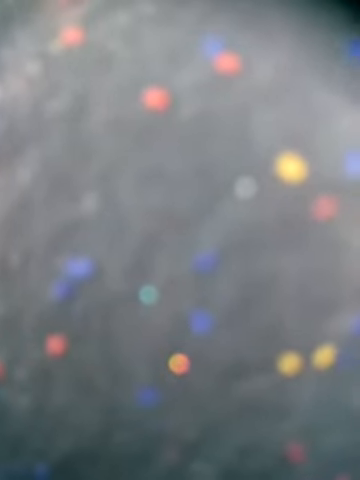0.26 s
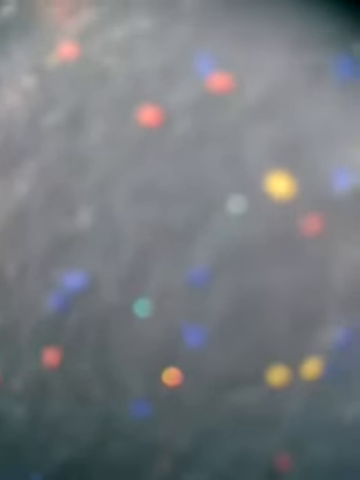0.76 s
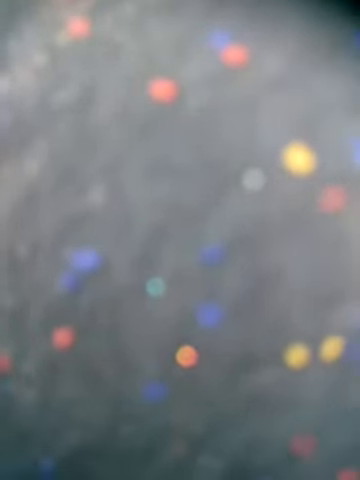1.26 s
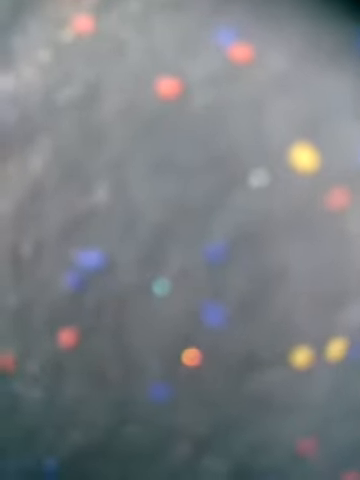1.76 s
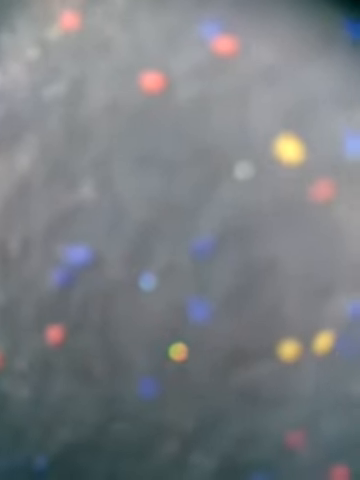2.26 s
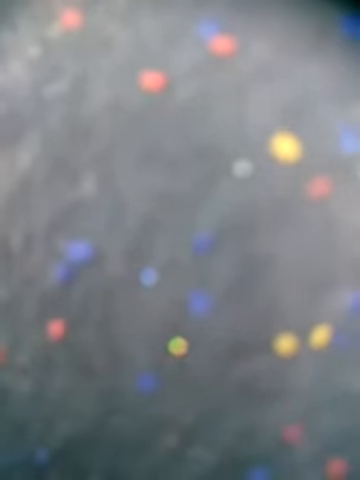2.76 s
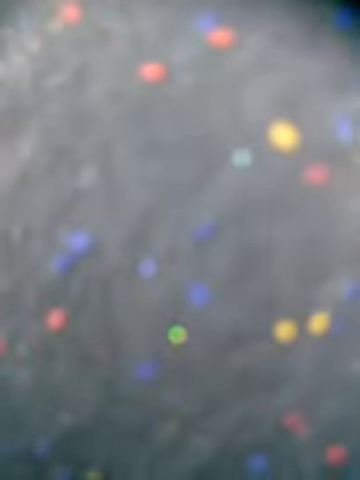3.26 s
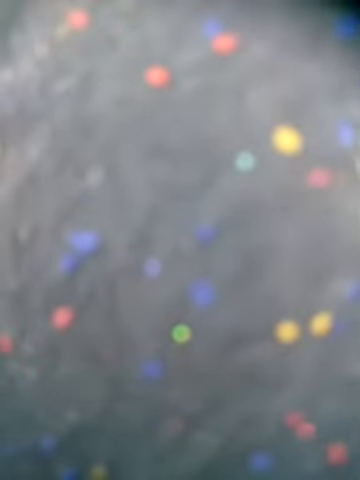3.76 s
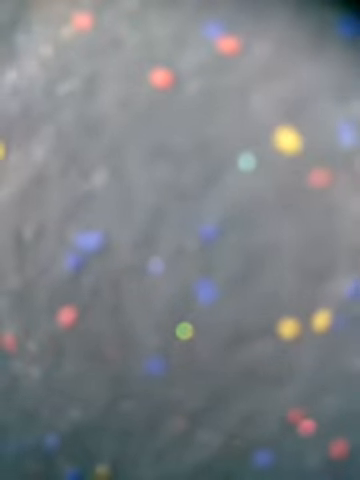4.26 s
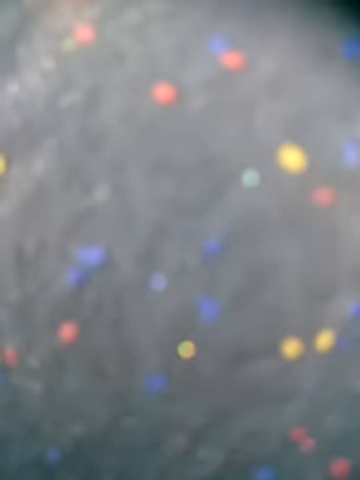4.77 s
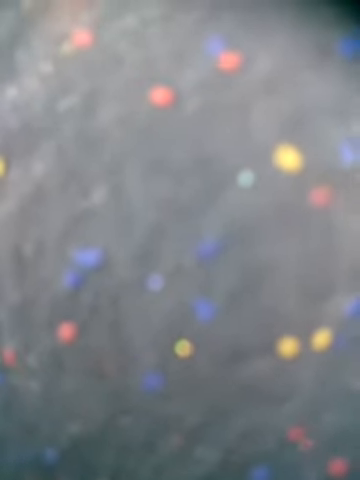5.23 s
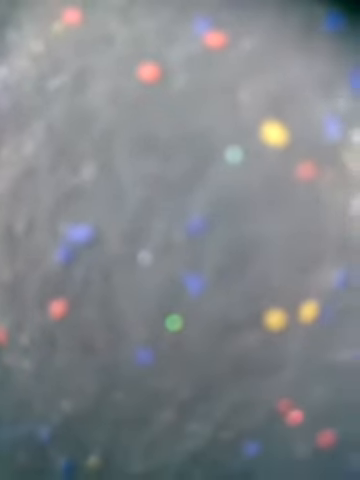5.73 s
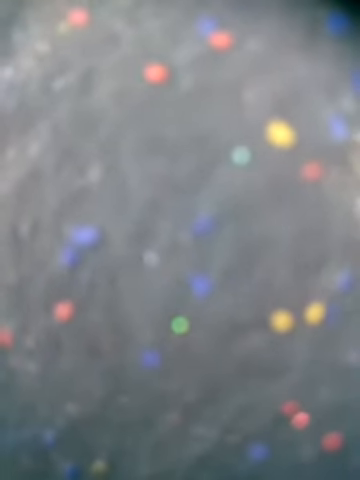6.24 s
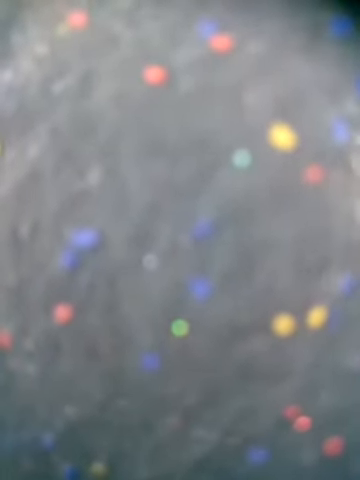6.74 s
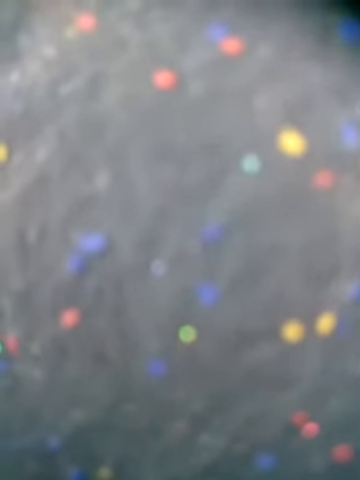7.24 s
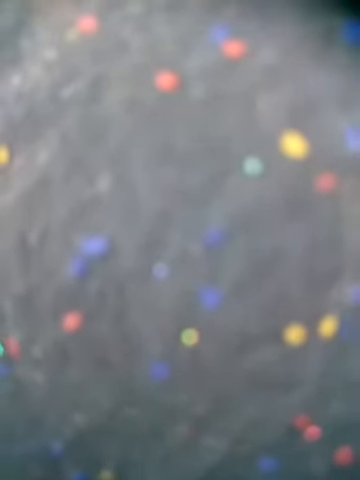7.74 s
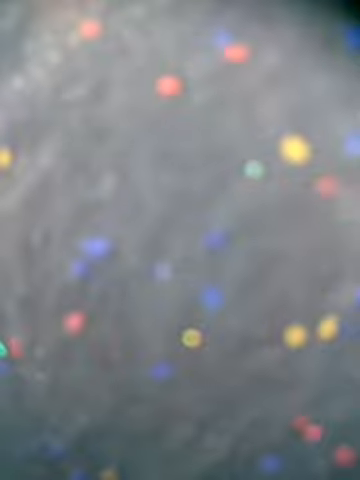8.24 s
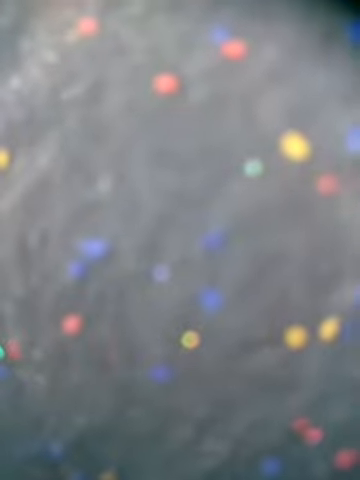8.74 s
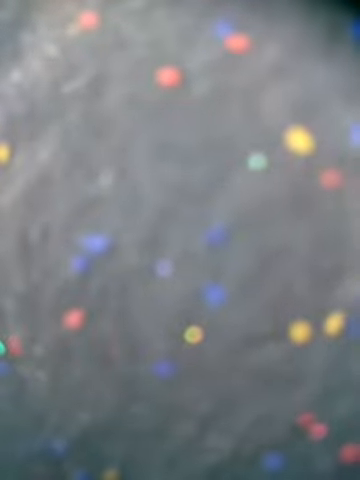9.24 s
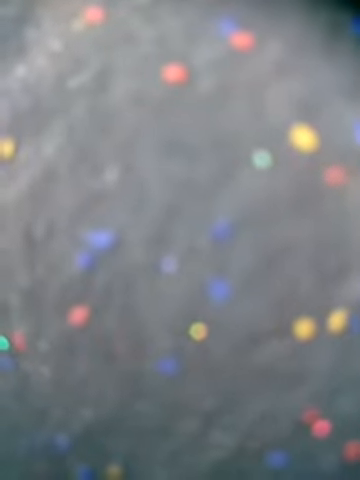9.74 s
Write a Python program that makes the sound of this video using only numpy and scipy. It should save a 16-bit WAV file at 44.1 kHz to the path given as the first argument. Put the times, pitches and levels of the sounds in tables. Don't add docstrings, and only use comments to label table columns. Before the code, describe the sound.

Inside a bus, a six-cylinder diesel drones from below, muffled and bass-heavy, over road rumble. At first it runs fairly lightly, its note sagging slightly; a trim tick sounds at 0.4 seconds and a soft brake squeal runs from about 0.6 to 1.6. Around 1.4 the fuel comes on, clatter and throb return, and a faint gear whine appears. The engine strengthens until about 3.1, when the gearbox shifts up: the pitch drops abruptly, with a puff of air, little rattles and cabin booms. It labours and wavers at this lower note, then climbs from 4.7. At about 5.05 it kicks down, the pitch jumps, and a much louder, deep full-load drone takes over. From there to 10 seconds it holds, creeping upward, with brighter intake hiss and a thin turbo whistle that rises until about 7.5. Close stereo microphones, the right nearer the floor.

```python
import sys
import numpy as np
from scipy import signal
from scipy.fft import rfft, irfft
from scipy.io import wavfile
from scipy.ndimage import uniform_filter1d

SR = 44100
rng = np.random.default_rng(int(sys.argv[2]) if len(sys.argv) > 2 else 0)


def magnitude_from_level(level_db):
    exponent = np.asarray(level_db, float) / 20
    return 10 ** exponent


def dump(signal):
    limited = np.clip(np.atleast_2d(signal).T, -1, 1)
    pcm = np.round(limited * 32767).astype(np.int16)
    wavfile.write(sys.argv[1], SR, pcm)


N = 441000
COARSE = 10

# pitch in Hz, likeness of the two sides from 0 to 1.
LIKENESS = [(60, .97), (200, .8), (250, 0.4), (330, 0.35), (470, .45), (700, .3), (1300, 0.55),
            (2400, 0.38), (5000, .55), (9000, .3), (12000, .15)]
# pitch in Hz, left minus right in dB.
SIDE_DB = [(60, -5), (92, -7.5), (140, -5), (210, -11), (330, -9), (500, -2), (770, -1), (1170, -5.5),
           (1790, -2), (2740, -2), (4190, -1), (6410, -5), (9810, 12), (15000, -5)]
# pitch in Hz, how far the left side leads in radians.
LEFT_LEAD = [(40, .5), (140, 0.4), (280, 0.046), (450, 1.18), (700, 0.79), (1100, 3.86), (1500, 2.3),
             (2000, 7.25), (3300, 8.37), (4000, 12.3), (5000, 14.14), (6000, 17.76), (8000, 16)]
MIC_HISS_DB = -98.5

FUEL_ON_S, FUEL_RISE_S = 1.416, 0.1
UPSHIFT_S, KICKDOWN_S, SHIFT_S = 3.05, 5.05, 0.19
# time in seconds, firings per second in Hz.
SPEED = [(0, 68.6), (.5, 64.4), (1.2, 62.5), (2.1, 63.1), (3.08, 65.8), (3.23, 50.6), (3.42, 50.9),
         (3.53, 53.4), (3.89, 53.9), (4.07, 49.0), (4.35, 50.4), (4.7, 52.4), (4.92, 56.3), (5.05, 60.5),
         (5.17, 68.6), (5.4, 68.2), (6.2, 68.9), (10, 70.55)]
# time in seconds, force of each firing in dB.
EFFORT = [(0, -6), (.5, -1.5), (.8, 2.5), (1.35, -2.5), (1.7, -4.5), (2.1, -3), (2.75, 3), (3.1, 3.5),
          (3.35, -5.5), (3.65, 4.5), (4.1, -0.5), (4.6, -1.5), (4.85, -1.5), (5.3, -4), (6, -0.5), (7.5, 0),
          (10, 0)]
# time in seconds, length in seconds, change in dB.
SLIPS = [
    (3.14, .07, -9),
    (5.05, .08, -9),
]

# pitch in Hz, level in dB per Hz.
FLOOR_PAN = [(24, -37), (33, -19), (48, -13.5), (60, -14), (78, 1.5), (100, -5), (120, -18.5), (170, -13),
             (255, -24.5), (300, -17), (400, -22), (510, -27), (640, -31), (1500, -99.5)]
# pitch in Hz, width in Hz, lift in dB.
CABIN = [(161.8, 11, 6.5), (195.7, 14, 4.5), (284.7, 12, 3.5), (328.2, 16, 7), (348, 12, 2.5), (430, 20, 4),
         (467.8, 24.5, 8), (599, 29, 4.5), (657, 18, 1.5), (757, 49, 8.5), (863.6, 31, 12)]
RUMBLE_DB = [-38.5, -36, -36.5]
COAST_RUMBLE_DB = -1.5

# pitch in Hz, level in dB per Hz.
CLATTER = [(350, -34), (560, -1), (800, -4.5), (1020, -7.5), (1300, -10.5), (1600, -12), (2000, -17),
           (2500, -12.5), (3200, -20), (3800, -27.5), (7000, -74)]
# pitch in Hz, width in Hz, lift in dB.
COVERS = [(536, 30, 5.5), (555, 28, 6.5), (953, 87, 5.5), (1115, 85, 3), (1233, 27, 5.5), (1407, 44, 4),
          (1634, 36, 6), (2010, 170, 8), (2150, 15, 5.5), (2210, 28, 4.5), (2490, 67, 4), (2680, 26, -1.5),
          (2760, 54, 5), (2990, 70, 8), (3130, 52, 4.5), (3480, 56, 5), (3930, 30, 5.5), (4360, 44, 5),
          (5240, 54, 7), (5610, 110, 5), (6160, 37, 4), (6620, 73, 4), (7580, 53, 5), (8960, 60, 7.5)]
CLATTER_DB, COAST_CLATTER_DB = -55.5, -3.5

# pitch in Hz, level in dB per Hz.
HISS_SLOW = [(1500, -57.5), (3400, -0.5), (4100, -5.5), (5200, 0), (6300, -7), (7400, -15.5), (8500, -24.5),
             (10000, -34), (11500, -21), (12600, -27.5), (14500, -28.5), (15700, -27)]
# pitch in Hz, level in dB per Hz.
HISS_FAST = [(1500, -56.5), (3400, -7.5), (4300, -8), (5800, -1), (6900, -6), (7800, -9.5), (8800, -17.5),
             (9900, -25), (11300, -18), (12400, -25), (13100, -25.5), (15700, -26.5)]
HISS_DB, HISS_DB_PER_OCTAVE, COAST_HISS_DB = -66.5, 11.5, -1.5
# time in seconds, length in seconds, level over the hiss in dB.
PUFFS = [
    (0.38, 0.016, 3.5),
    (3.167, 0.047, -0.5),
    (3.334, 0.015, 2),
    (4.819, .04, 1.5),
]

# time in seconds, peak level in dB.
TICKS = [(0.3726, -49), (1.1488, -61), (1.9405, -61), (2.9836, -52), (3.0495, -51), (3.0894, -51),
         (3.3323, -47), (3.413, -46), (3.7494, -53), (4.8698, -55.5)]
# time in seconds, pitch in Hz, level in dB.
TURBO = [(0, 4026, -91), (2.2, 4490, -79.5), (2.65, 4900, -69), (2.85, 5330, -68.5), (3.05, 5700, -63),
         (3.4, 5710, -69.5), (3.8, 5716, -63), (4.3, 5760, -68.5), (4.75, 5790, -63), (5.1, 6050, -59.5),
         (5.5, 6510, -61), (6, 6930, -65), (6.5, 7150, -66), (7, 7220, -68), (7.5, 7560, -71),
         (8.5, 7610, -71), (10, 7540, -67)]
# time in seconds, pitch in Hz, level in dB.
WHINES = [
    [(1.3, 1180, -77.5), (1.6, 1141, -64.5), (3.1, 1211, -66), (3.4, 1209, -70), (4.6, 1205, -92),
     (5, 1192, -65), (10, 1184, -69)],
    [(2.9, 2700, -81), (3.2, 2680, -65.5), (4, 2680, -66.5), (4.8, 2753, -67.5), (5.2, 2780, -75)],
    [(3.1, 3930, -91), (3.6, 3900, -74), (4.6, 3940, -74), (5.1, 3970, -88)],
]
# time in seconds, pitch in Hz, level in dB.
SQUEAL = [(.55, 1265, -73), (.64, 1245, -64.5), (.8, 1197, -63), (.92, 1165, -64.5), (1.3, 1187, -66.5),
          (1.45, 1190, -66), (1.7, 1170, -80)]
# start in seconds, length in
# seconds, pitch in Hz, glide in Hz per second, level in dB.
BOOMS = [(0, .5, 320, -10, -53), (.65, .33, 312, 30, -51), (0, .35, 163, -20, -50),
         (.27, .22, 204, -30, -45), (.6, .35, 148, 10, -46), (.58, .45, 191, -5, -47), (0, 1, 92, -10, -46),
         (.8, .8, 88, 5, -42.5), (1.45, .3, 125, 5, -44), (1.85, .35, 322, 5, -53),
         (1.9, .3, 195, -20, -49), (2.3, .8, 368, 3, -53), (2.97, .33, 200, 5, -40),
         (2.97, .3, 165, 5, -42), (2.95, .17, 362, -10, -48), (3.05, .25, 281, 5, -47),
         (3.2, .25, 153, -5, -39), (3.5, .35, 324, -5, -51), (3.33, .25, 76, 5, -35.5),
         (3.85, .25, 209, -45, -39), (3.98, .24, 290, 30, -49), (4.05, .17, 342, 20, -49),
         (4.76, .22, 278, 60, -43.5), (4.76, .22, 328, -5, -46), (4.86, .16, 207, -5, -42),
         (4.92, .27, 88, 30, -33), (4.93, .25, 155, 5, -41), (4.98, .16, 290, -5, -46),
         (5.08, .25, 335, 30, -48), (3, 1.4, 468, 0, -56), (5.22, .17, 76, -5, -30)]
BOOM_EDGE, BOOM_EDGE_DB = 0.22, -16

# multiple of the firing rate, then dB at light load, after the upshift, at full load.
FIRING = [(1, -53, -54, -39.5), (2, -52, -49.5, -30.5), (3, -54.5, -44.5, -49.5), (4, -55.5, -53, -45),
          (5, -56.5, -53, -48), (6, -54.5, -56.5, -56.5)]
COAST_FIRING_DB = [-4.5, 3, 0.5, -6.5, -1.5, -3]
SLIP_SHARE = [.12, .6, .9, 1.1, 1.1, 1.1]
# seconds early, swell in seconds.
ANSWER = [(0.36, 0.67), (0.026, 0.13), (-.03, 0.17), (-0.011, 0.23), (-.05, .2), (-.05, .2)]
PULSE_SHAPE = [0, .65, 1.9, 1.25, .6, 0]
FLUTTER_DB = [2, .9, .7]
# pitch in Hz, width in Hz, lift in dB.
SHELL = [(65.08, 14.1, 18), (101.2, 9.1, 15), (164.1, 10.7, 16), (204.4, 13.3, 11)]
COAST_SHELL = 0.54
LAG_HZ, LAG_PER_HZ = 69, 0.36

# multiple of the
# camshaft rate, then dB at light load, after the upshift, at full load.
UNEVEN = [(5, -63, -63, -49.5), (7, -41, -51.5, -38), (8, -49, -53.5, -51), (9, -41, -56, -54),
          (10, -50.5, -52.5, -63), (11, -56.5, -55.5, -50.5), (13, -61.5, -57.5, -67),
          (14, -60, -60, -39.5), (15, -45.5, -51, -61), (16, -63.5, -55, -56), (17, -59.5, -51, -61),
          (19, -61, -60.5, -63.5), (20, -59, -60.5, -53), (21, -69, -62, -58.5), (22, -60.5, -67, -66),
          (23, -60.5, -54, -71), (25, -59, -62, -54), (26, -57.5, -60.5, -56), (27, -47.5, -55, -54),
          (28, -50, -62, -46), (29, -65.5, -63.5, -60.5), (31, -52, -57, -49.5), (32, -70.5, -58, -66.5),
          (33, -69.5, -59.5, -60.5), (34, -54.5, -54.5, -62.5), (35, -62, -61, -64),
          (37, -67, -66.5, -57.5), (38, -64, -56, -67.5), (39, -71, -57, -71), (40, -68.5, -63, -54.5),
          (41, -71.5, -65, -60.5), (42, -62, -63, -67), (43, -70, -60, -81),
                (44, -63.5, -68.5, -79.5), (45, -61.5, -70, -83), (47, -81, -71.5, -68),
                (48, -75.5, -77, -72), (49, -78, -61.5, -78.5), (50, -71, -72, -69.5),
                (51, -69.5, -66, -62), (52, -76, -55.5, -56), (53, -71, -61.5, -81),
                (54, -66.5, -69.5, -79.5), (55, -72, -63, -79), (56, -76.5, -66.5, -80.5),
                (57, -73, -76, -65.5), (60, -81, -76, -81.5), (62, -88, -80.5, -71.5),
                (64, -78.5, -77.5, -73.5), (68, -78.5, -75, -82), (70, -78, -83, -89.5),
                (75, -83.5, -77, -76), (82, -80.5, -76, -85)]
MULTIPLES = [5, 7, 8, 9, 10, 11, 13, 14, 15, 16, 17, 19, 20, 21, 22, 23, 25, 26, 27, 28, 29, 31, 32, 33, 34,
             35, 37, 38, 39, 40]
MULTIPLES_UPPER = [41, 42, 43, 44, 45, 47, 48, 49, 50, 51, 52, 53, 54, 55, 56, 57, 60, 62, 64, 68, 70, 75,
                   82]
USUAL_HZ = [63.5, 51.5, 69.5]
BITE_DB, BITE_S = -3, 3.4
COAST_SHAKE_DB, SHAKE_RISE_S = -12.5, 0.18


def curve(rows, t):
    s, *columns = np.transpose(rows)
    return [np.interp(t, s, column) for column in columns]


def read(points, hz):
    f, value = np.transpose(points)
    return np.interp(np.log(hz + 1), np.log(f + 1), value)


def bumps(modes, hz):
    return sum(db / (1 + (2 * (hz - f) / width) ** 2) for f, width, db in modes)


def evened(x):
    return x / np.sqrt(np.mean(x ** 2) + 1e-20)


def wander(top_hz, count, size):
    steps = rng.standard_normal((count, 400))
    smooth = uniform_filter1d(steps, max(1, round(20 / top_hz)), axis=1)
    at = np.linspace(0, size, 400)
    return [np.interp(np.arange(size), at, evened(row)) for row in smooth]


def ramp(t, start_s, length_s):
    return np.clip((t - start_s) / length_s, 0, 1)


def gear_state(t, early_s=0, swell_s=SHIFT_S):
    return ramp(t, UPSHIFT_S, SHIFT_S) + ramp(t + early_s, KICKDOWN_S, swell_s)


def by_gear(gear, values):
    return np.interp(gear, np.arange(3), values)


def coasting(t):
    return 1 - ramp(t, FUEL_ON_S, FUEL_RISE_S)


def puffs_db(t, rows):
    return sum(db * np.exp(-((t - s) / length) ** 2) for s, length, db in rows)


def pair(x):
    pad = 1000
    padded = len(x) + 2 * pad
    x = np.pad(x, pad, "reflect") * signal.windows.tukey(padded, 2 * pad / padded)
    size = padded * COARSE
    spectrum = rfft(x)
    hz = np.arange(len(spectrum)) * SR / size
    half = magnitude_from_level(read(SIDE_DB, hz) / 2)
    both = np.array([half * np.exp(1j * read(LEFT_LEAD, hz)), 1 / half])
    both = both * 2 / (half + 1 / half)
    out = COARSE * irfft(spectrum * both, size)
    return out[:, pad * COARSE:][:, :N]


def noise(field_db, patchy_db, ripple_db, size):
    hop = size // 4
    hz = np.fft.rfftfreq(size, 1 / SR)
    t = np.arange(N // hop + 5) * hop / SR
    a, b, c, d, patches = rng.standard_normal((len(t), len(hz), 5)).T
    patches = evened(uniform_filter1d(uniform_filter1d(patches, 8, 0), 10, 1))
    ripple = rng.standard_normal((2, len(hz), 1))
    ripple = evened(uniform_filter1d(ripple, size=3, axis=1))
    same = np.clip(read(LIKENESS, hz), 0, 1)[:, None]
    half = magnitude_from_level(read(SIDE_DB, hz) / 2)[:, None]
    right = a + 1j * b
    left = same * right * np.exp(1j * read(LEFT_LEAD, hz))[:, None]
    left = left + np.sqrt(1 - same ** 2) * (c + 1j * d)
    level_db = field_db(hz[:, None], t) + patchy_db * patches + ripple_db * ripple
    spectra = np.array([left * half, right / half]) * magnitude_from_level(level_db)
    both = signal.istft(spectra, nperseg=size, noverlap=size - hop)[1]
    return both[:, :N] / np.sqrt(np.mean(both.mean(0) ** 2))


def whistle(rows, width, same=0., side_db=0., steady=0.):
    at = np.arange(round(rows[0][0] * SR), min(N, round(rows[-1][0] * SR)))
    hz, db = curve(rows, at / SR)
    turn = np.exp(2j * np.pi * np.cumsum(hz) / SR)
    r = np.exp(-np.pi * width / SR)
    slow = signal.lfilter([1 - r], [1, -r], rng.standard_normal((2, 2, len(at))))
    left, right = signal.lfilter([1 - r], [1, -r], slow[0] + 1j * slow[1])
    sides = magnitude_from_level(np.array([[0.5], [-0.5]]) * side_db)
    both = np.array([same * right + np.sqrt(1 - same ** 2) * left, right]) * sides
    both = both + steady * np.std(right) * sides
    soft_ends = signal.windows.tukey(len(at), 1000 / len(at))
    out = np.zeros((2, N))
    out[:, at] = magnitude_from_level(db) * evened((turn * both).real) * soft_ends
    return out


def rumble(t):
    def field(hz, s):
        return read(FLOOR_PAN, hz) + bumps(CABIN, np.minimum(hz, 560)) + 0 * s

    level_db = by_gear(gear_state(t), RUMBLE_DB) + COAST_RUMBLE_DB * coasting(t)
    return magnitude_from_level(level_db) * noise(field, patchy_db=0.0, ripple_db=1.05, size=4096)


def intake_hiss(t):
    def field(hz, s):
        boost = np.clip((curve(TURBO, s)[0] - 4300) / 3200, 0, 1)
        return (1 - boost) * read(HISS_SLOW, hz) + boost * read(HISS_FAST, hz) + bumps(COVERS, hz)

    octaves = np.log2(curve(TURBO, t)[0] / TURBO[0][1])
    level_db = HISS_DB + HISS_DB_PER_OCTAVE * octaves + COAST_HISS_DB * coasting(t) + puffs_db(t, PUFFS)
    level_db = level_db + 1.5 + 0.5 * wander(top_hz=12, count=1, size=N)[0]
    hiss = noise(field, patchy_db=0.5, ripple_db=2.3, size=4096)
    hiss = hiss / np.sqrt(uniform_filter1d((hiss ** 2).mean(0), 30000))
    return magnitude_from_level(level_db) * hiss


def clatter(t):
    def field(hz, s):
        ringing = 1 - 0.5 * coasting(s)
        return read(CLATTER, hz) + ringing * bumps(CABIN + COVERS, hz)

    level_db = CLATTER_DB + COAST_CLATTER_DB * coasting(t)
    return magnitude_from_level(level_db) * noise(field, patchy_db=0.17, ripple_db=-0.3, size=4096)


def trim_ticks():
    length = 2000
    out = np.zeros((2, N + length))
    fade_db = -60 * np.arange(length) / SR / 0.05
    bright = signal.butter(2, [3200, 6800], "band", fs=SR, output="sos")
    for s, db in TICKS:
        at = round(s * SR)
        burst = signal.sosfilt(bright, rng.standard_normal((2, length)))
        out[:, at:at + length] += magnitude_from_level(db - 5 + fade_db) * burst
    return out[:, :N]


def brake_squeal():
    rough = whistle(SQUEAL, width=130, same=0.5, side_db=-2.0)
    firm = whistle(SQUEAL, width=40, same=0.5, side_db=-2.0, steady=1.6)
    return magnitude_from_level(-2) * (rough + firm)


def cabin_boom(start, length, hz, glide, db):
    edge = BOOM_EDGE * min(length, 0.5)
    at = np.array([0, edge, length - edge, length])
    level_db = db + BOOM_EDGE_DB * np.array([1, 0, 0, 1])
    rows = np.transpose([start + at, hz + glide * at, level_db])
    return whistle(rows, width=20, same=0.75, side_db=-6.5, steady=2.4)


def gear_whine():
    low = whistle(WHINES[0], width=130, side_db=1.5)
    middle = whistle(WHINES[1], width=430, side_db=2.5)
    high = whistle(WHINES[2], width=45, same=0.5)
    return low + middle + high


def turbo_whistle():
    x = whistle(TURBO, width=400, same=0.4, side_db=-1.5)
    ringing = magnitude_from_level(bumps(COVERS, np.fft.rfftfreq(N, 1 / SR)))
    return magnitude_from_level(-1.5) * irfft(rfft(x) * ringing, N)


def cam_angle(hz):
    return 2 * np.pi * np.cumsum(hz) * COARSE / SR / 6


def uneven_cylinders(t):
    hz, gear = curve(SPEED, t)[0], gear_state(t)
    cam, usual_hz = cam_angle(hz), by_gear(gear, USUAL_HZ)
    shake_db = COAST_SHAKE_DB * (1 - ramp(t, FUEL_ON_S, SHAKE_RISE_S)) + puffs_db(t, SLIPS)
    shake_db = shake_db + BITE_DB * np.maximum(gear - 1, 0) * (1 - ramp(t, KICKDOWN_S, BITE_S))

    def passed_db(f):
        return read(FLOOR_PAN, np.minimum(f, 500)) + bumps(CABIN, f)

    lines = UNEVEN
    drift = wander(top_hz=6, count=len(lines), size=len(t))
    out = 0
    for multiple, (_, *states_db), sway in zip(MULTIPLES + MULTIPLES_UPPER, lines, drift):
        db = by_gear(gear, states_db) + shake_db + 1.06 * sway
        db = db + 0.8 * (passed_db(multiple * hz / 6) - passed_db(multiple * usual_hz / 6))
        out = out + magnitude_from_level(db) * np.cos(multiple * cam + 2 * np.pi * rng.random() + 0.16 * sway)
    return out


def firing_pulses(t):
    hz = curve(SPEED, t)[0]
    cam, effort_db, slip_db = cam_angle(hz), curve(EFFORT, t)[0], puffs_db(t, SLIPS)
    flutter_db = by_gear(gear_state(t), FLUTTER_DB)
    shell_share = 1 - COAST_SHELL * coasting(t)
    drift = wander(top_hz=6, count=len(FIRING), size=len(t))
    out = 0
    for k, (_, *states_db) in enumerate(FIRING):
        db = by_gear(gear_state(t, *ANSWER[k]), states_db) + COAST_FIRING_DB[k] * coasting(t)
        db = db + SLIP_SHARE[k] * slip_db + effort_db
        db = db + shell_share * bumps(SHELL, (k + 1) * hz) + flutter_db * drift[k]
        angle = 6 * (k + 1) * cam + PULSE_SHAPE[k]
        if k == 0:
            angle = angle - np.arctan(LAG_PER_HZ * (hz - LAG_HZ))
        out = out + magnitude_from_level(db) * np.cos(angle)
    return out


def engine(t):
    t = t[::COARSE]
    return pair(np.sqrt(2) * (uneven_cylinders(t) + firing_pulses(t)))


def scene():
    t = np.arange(N) / SR
    background = rumble(t) + intake_hiss(t) + clatter(t)
    events = trim_ticks() + brake_squeal() + sum(cabin_boom(*row) for row in BOOMS)
    machinery = gear_whine() + turbo_whistle() + engine(t)
    return background + events + machinery


def band_limit(x):
    return signal.sosfilt(signal.butter(12, 15720, fs=SR, output="sos"), x)


def record(dry):
    hiss = magnitude_from_level(MIC_HISS_DB) * np.diff(rng.standard_normal((2, N + 1)))
    soft_end = np.minimum((N - np.arange(N)) / SR / 0.002, 1)
    return band_limit((dry + hiss) * soft_end)


dry = scene()
out = record(dry)
dump(out)
```